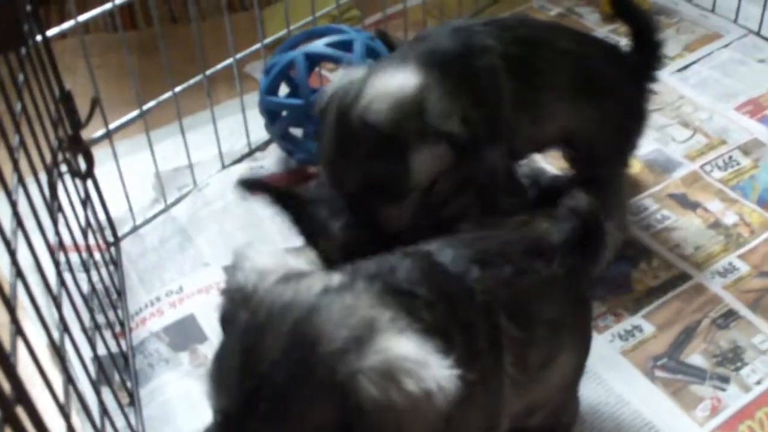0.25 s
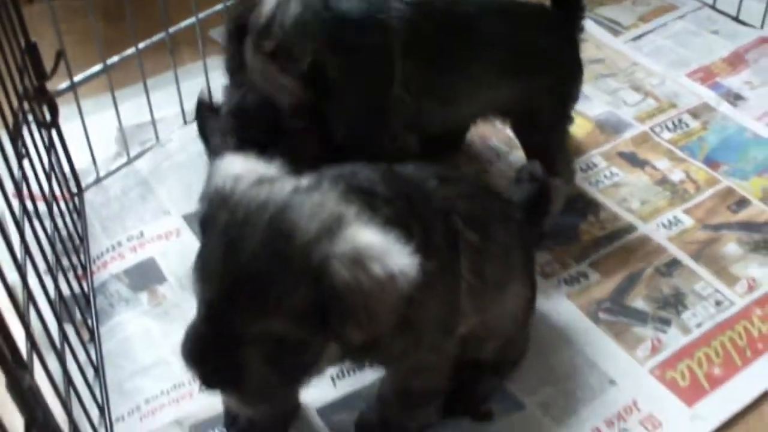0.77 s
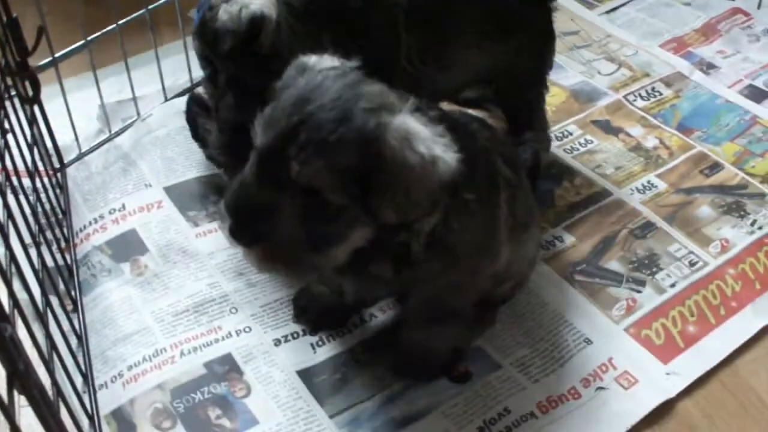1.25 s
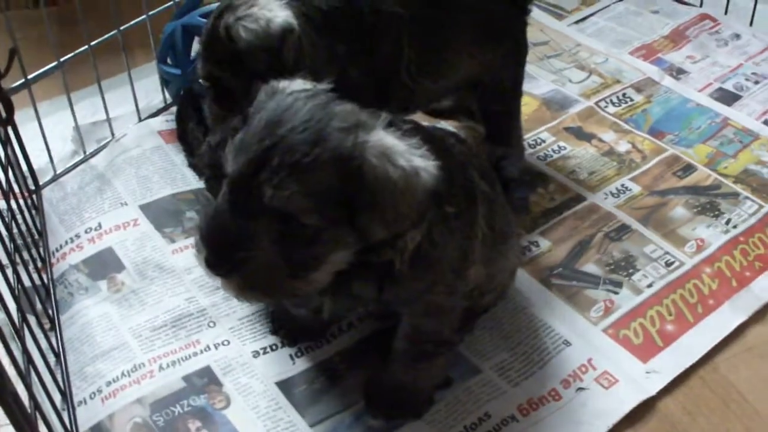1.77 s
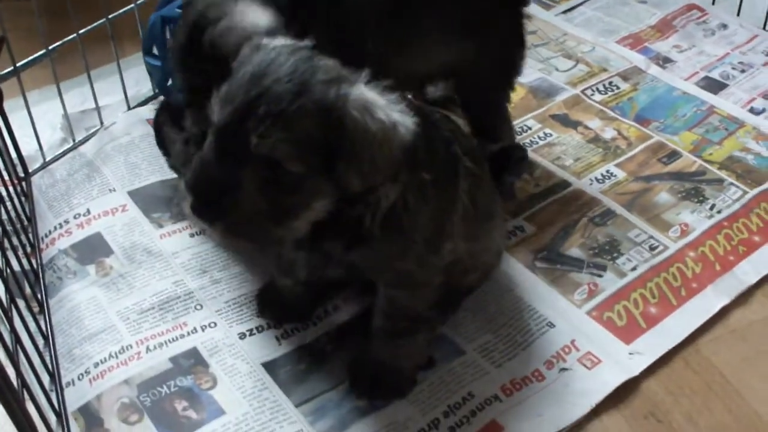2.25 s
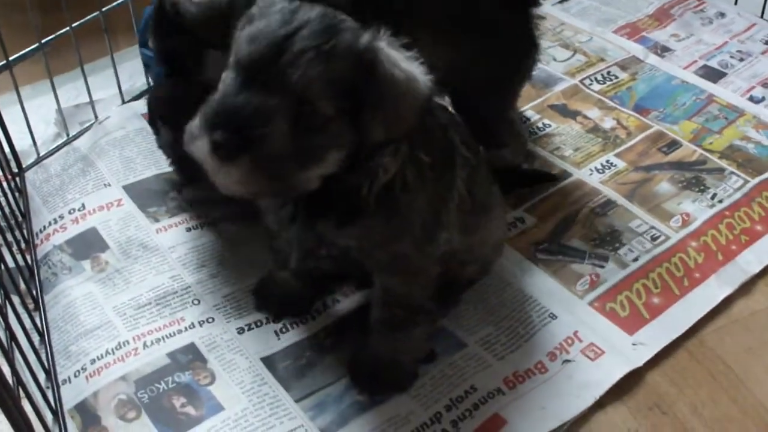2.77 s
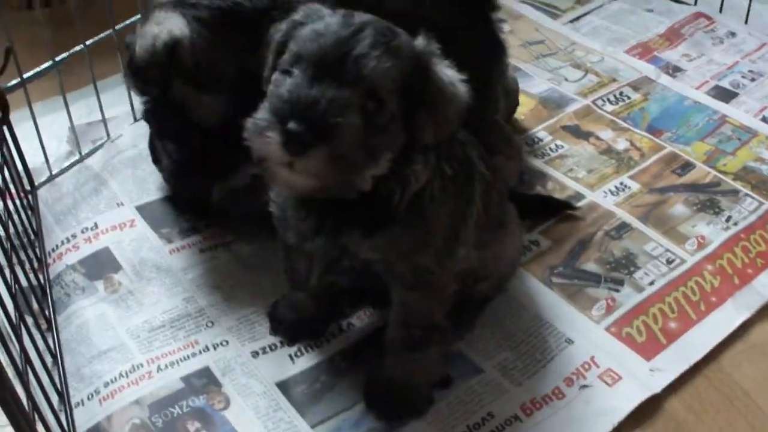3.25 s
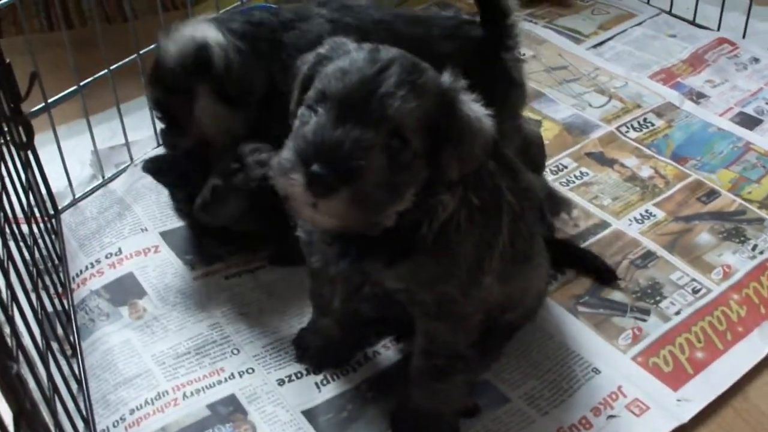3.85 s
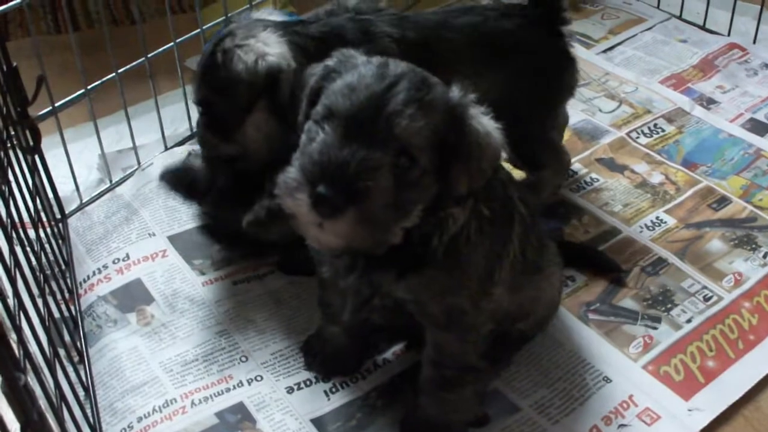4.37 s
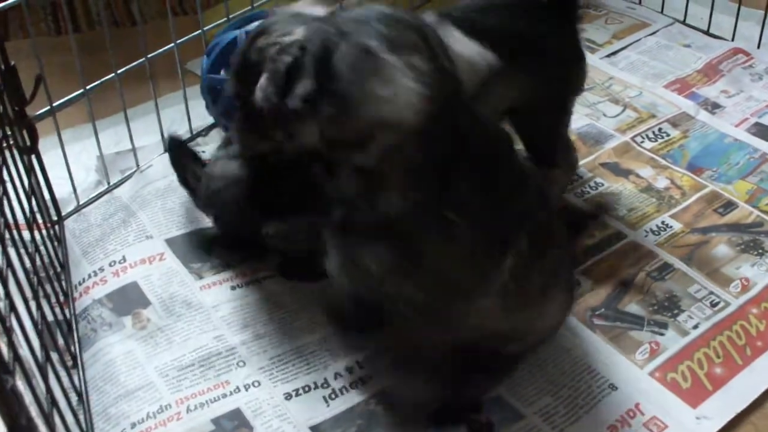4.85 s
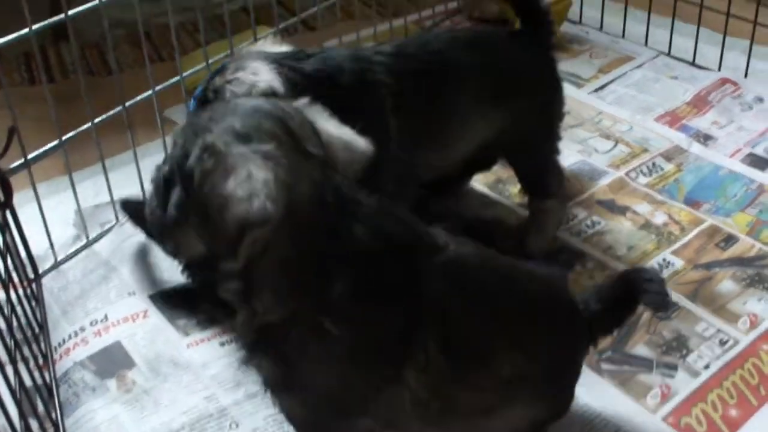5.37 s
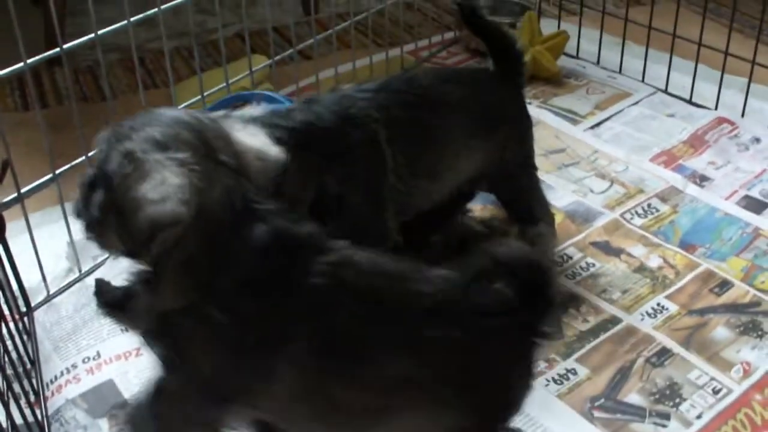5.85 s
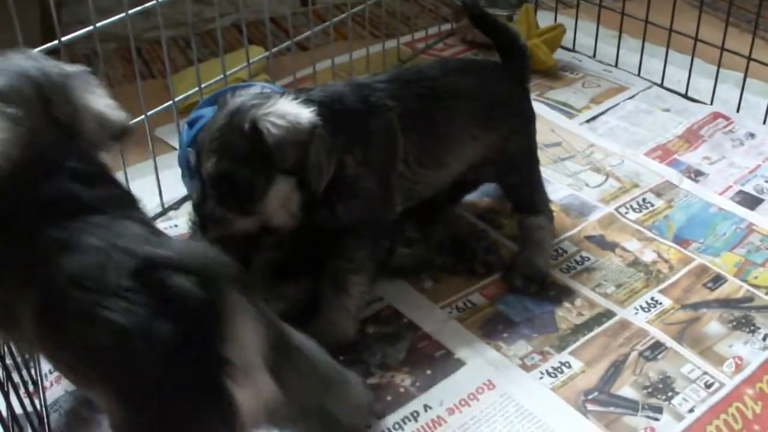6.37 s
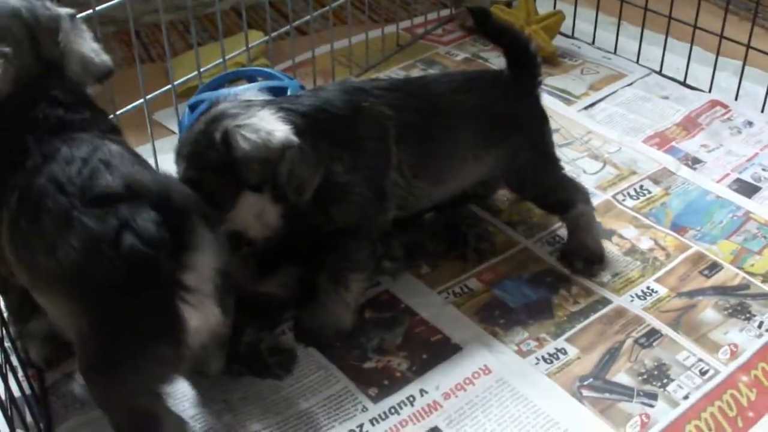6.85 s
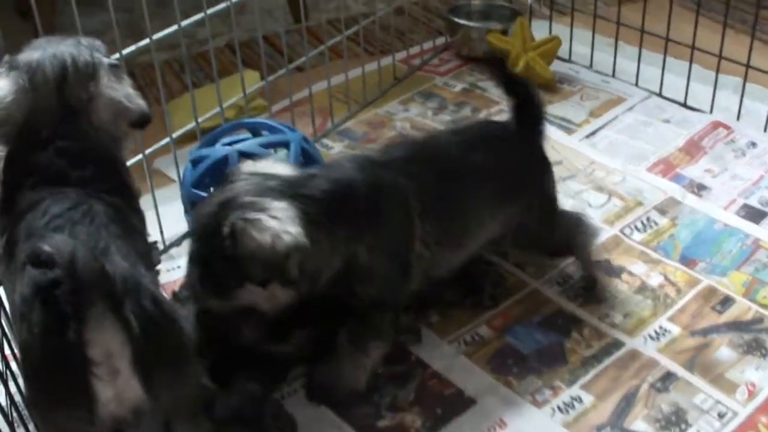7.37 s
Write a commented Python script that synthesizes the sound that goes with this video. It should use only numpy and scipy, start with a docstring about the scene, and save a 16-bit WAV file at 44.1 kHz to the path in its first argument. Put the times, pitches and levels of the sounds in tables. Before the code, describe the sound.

A small, short-echoing room, heard through a modest stereo recorder with constant wide hiss, a very faint high whine and muted top treble. Dull newspaper rustle continues throughout. From 0 to 0.2 s there are small claw ticks, then soft snuffles at 0.3 and 0.75 and paw knocks with a crinkle around 0.85. At 1.24 a high, wavering puppy squeal lasts about 0.3 s, falling slightly and breaking hoarse. Light ticks follow near 2.25; a tiny yip at 2.7. It is quieter until snuffles at 3.66 and 3.93, with taps around 4. A sharp, brighter yelp comes at 4.65, a lower raspy one at 5.03, then quick nose puffs and a crinkle by 5.45. From 5.85 taps cluster; a hoarse squeak sounds at 6.2. Busy knocks, clicks and paper bursts run from 6.6 to 7.15, strongest near 7.06, then a snuffle at 7.34 and rising rustle to the end.

```python
"""Five short puppy yelps, snuffles, claw taps and rustling newspaper in a wire pen indoors, over a wide hiss.
Yelps are harmonics that break into hoarse breath; snuffles are air through a nose resonance; taps ring
floor and claw modes; the paper is clumped grains over sliding noise; the room is dying noise.
The small stereo recorder dips the 3-5 kHz range with three notches and cuts the top."""
import sys
import numpy as np
from scipy import signal
from scipy.fft import rfft, irfft
from scipy.io import wavfile
from scipy.ndimage import uniform_filter1d

SR = 44100
rng = np.random.default_rng(int(sys.argv[2]) if len(sys.argv) > 2 else 0)


def unload_audio(sound):
    """Save the sound as a 16-bit wav file, at the path given as the first command line argument."""
    columns = np.transpose(np.atleast_2d(sound))
    # keep every value between -1 and 1, then stretch to whole-number steps
    steps = np.round(np.clip(columns, -1, 1) * 32767)
    wavfile.write(sys.argv[1], SR, steps.astype(np.int16))


def makeup_ratio(level_db):
    """Linear amplitude ratio for a level in decibels (20 dB per factor of ten)."""
    decades = np.asarray(level_db, float) / 20
    return 10 ** decades


N = 335452

# how busily the bodies shift on the paper: (time [s], dull rustle level [dB])
BUSTLE = [(0, -60.5), (.15, -64), (.9, -64), (1.6, -61.5), (2.0, -64.5), (2.4, -64.5), (2.7, -66),
          (3.7, -63), (4.05, -62), (4.6, -65.5), (5.0, -61.5), (5.65, -66.5), (6.0, -60), (6.35, -61.5),
          (6.78, -59.5), (7.1, -61.5), (7.35, -62.5), (7.6, -57)]


def rms_one(x):
    """Scale to rms 1."""
    return x / np.sqrt(np.mean(x ** 2) + 1e-20)


def in_time(rows):
    """Columns of a (time [s], ...) table as sample-rate curves."""
    time_s, *columns = np.transpose(rows)
    return [np.interp(np.arange(N) / SR, time_s, column) for column in columns]


def at_hz(points, hz):
    """Read a (frequency [Hz], value) table on a log-frequency axis."""
    points = np.array(points)
    return np.interp(np.log(np.maximum(hz, 1)), np.log(points[:, 0]), points[:, 1])


def coloured(x, spectrum):
    """Give noise a spectrum; rms 1."""
    gain = makeup_ratio(at_hz(spectrum, np.fft.rfftfreq(N, 1 / SR)))
    return rms_one(irfft(rfft(x) * gain, N))


def drift(rate_hz):
    """Slow random curve of rms 1: noise through two equal one-pole low-passes."""
    r = np.exp(-2 * np.pi * rate_hz / SR)
    noise = rng.standard_normal(N + SR)
    return rms_one(signal.lfilter([1], [1, -2 * r, r * r], noise)[SR:])


def ring(clicks, hz, t60_s):
    """Two-pole resonator: a unit click starts a decaying sine of initial height 1."""
    r, w = makeup_ratio(-60 / (t60_s * SR)), 2 * np.pi * hz / SR
    return signal.lfilter([0, np.sin(w)], [1, -2 * r * np.cos(w), r * r], clicks + 1e-18)


def yelps():
    """Harmonics on a wavering pitch; hoarseness trades the upper ones for breath pulsing with each cycle."""
    # one track a yelp: (time [s], pitch [Hz], fundamental level [dB], second harmonic level [dB])
    tracks = [
        [(1.24, 872, -64, -60), (1.247, 849, -46, -53), (1.262, 1115, -41, -46), (1.282, 1164, -37, -46.5),
         (1.312, 1170, -58, -39.5), (1.335, 1137, -34, -44.5), (1.372, 1125, -33, -41),
         (1.386, 1107, -34.5, -43.5), (1.415, 1137, -35, -44), (1.43, 1101, -33.5, -47.5),
         (1.44, 1060, -38.5, -49), (1.475, 1029, -42.5, -40.5), (1.495, 1033, -42.5, -47.5),
         (1.51, 1094, -40.5, -48), (1.522, 1013, -46, -55), (1.545, 1052, -56, -66)],
        [(2.7, 1301, -60, -76), (2.709, 1350, -49, -53), (2.713, 1297, -45, -54), (2.722, 1230, -37, -46),
         (2.736, 1145, -35, -40), (2.742, 1152, -36, -40.5), (2.749, 1224, -42.5, -52), (2.756, 1243, -32, -53),
         (2.762, 1200, -47, -56)],
        [(4.65, 1526, -57, -90), (4.657, 1571, -31, -88), (4.663, 1510, -37, -80), (4.667, 1273, -39, -41.5),
         (4.686, 1265, -34, -40), (4.7, 1293, -35, -44), (4.713, 1348, -40.5, -55), (4.726, 1270, -30, -54),
         (4.732, 1188, -41, -46), (4.738, 946, -43.5, -60)],
        [(5.028, 1101, -62, -73), (5.032, 1081, -43, -59), (5.041, 810, -39, -37.5),
         (5.052, 803.5, -36.5, -40.5), (5.063, 818, -36.5, -44.5), (5.07, 863, -43, -43),
         (5.076, 1027, -40, -54), (5.08, 1006, -58, -62)],
        [(6.193, 1134, -73, -70), (6.197, 1117, -37, -66), (6.21, 960, -41.5, -38.5), (6.222, 834, -39, -38.5),
         (6.233, 915, -39, -51), (6.244, 846, -38, -55), (6.25, 852, -54, -62)],
    ]
    # voice of each yelp: (break time [s], hoarseness before [0-1], hoarseness after [0-1], left-right [dB])
    voices = [(1.435, .06, .36, -1), (2.718, .08, .4, 0), (4.71, .08, .3, -.5), (5.03, .85, .85, 1.5),
              (6.215, .65, .9, .5)]
    # upper harmonics and breath: (frequency [Hz], level [dB])
    throat = [(3000, -15), (3600, -6), (4600, 3.5), (5600, 4), (6500, 8), (7500, 0.5), (9000, -2),
              (11000, -7), (14000, -44)]
    # each yelp, relative to its two low harmonics: (treble level [dB], rasp level [dB])
    overtones = [(-15.5, -23), (-15.5, -18), (-13, -19), (-16.5, -19.5), (-19.5, -10.5)]
    # rasp spectrum: (frequency [Hz], density [dB per Hz])
    rasp_colour = [(300, -35), (800, 3), (1400, -7), (2000, 5), (3000, -11.5), (6000, -24.5)]
    break_length_s, onset_s = 0.031, 0.01
    hoarse_treble_db, hoarse_rasp_db = 8, 8.5  # gain per unit of added hoarseness

    pitch_hz, first_db, second_db = in_time(sum(tracks, []))
    t = np.arange(N) / SR
    starts_s = np.array([track[0][0] for track in tracks])
    which = np.maximum(np.searchsorted(starts_s, t, side="right") - 1, 0)
    voiced = sum((t >= track[0][0]) & (t <= track[-1][0]) for track in tracks)
    voiced = uniform_filter1d(voiced.astype(float), size=90)

    break_s, clear, broken, pan_db = np.transpose(voices)[:, which]
    hoarse = clear + (broken - clear) * np.clip((t - break_s) / break_length_s + .5, 0, 1)
    added = hoarse - clear

    effort = np.hypot(makeup_ratio(first_db), makeup_ratio(second_db))
    treble_db, rasp_db = np.transpose(overtones)[:, which]
    opened = np.clip((t - starts_s[which]) / onset_s, 0, 1) ** 2
    treble = effort * makeup_ratio(treble_db + hoarse_treble_db * added) * opened
    rasp = effort * makeup_ratio(rasp_db + hoarse_rasp_db * added) * opened

    jitter = np.sqrt(hoarse) * .006 * drift(150) + (.004 + .05 * added) * drift(30)
    phase = 2 * np.pi * np.cumsum(pitch_hz * (1 + jitter)) / SR
    shimmer = makeup_ratio(1.8 * hoarse * drift(150))
    flutter = makeup_ratio(16 * added * np.clip([drift(110), drift(110)], -3, .8))
    low = makeup_ratio(first_db) * flutter[0] * np.sin(phase)
    low += makeup_ratio(second_db) * flutter[1] * np.sin(2 * phase + 1)

    upper, power = 0, 0
    for order in range(3, 16):
        harmonic_hz = order * pitch_hz
        weight = makeup_ratio(at_hz(throat, harmonic_hz)) * (harmonic_hz < 15000)
        upper = upper + weight * np.sin(order * phase + (order - 3) ** 2)
        power = power + weight ** 2 / 2
    upper /= np.sqrt(power)

    breath = coloured(rng.standard_normal(N), [(1500, -35)] + throat) * (1 + .5 * np.sin(phase))
    voice = np.sqrt(2) * low + treble * (np.sqrt(1 - hoarse) * upper + np.sqrt(hoarse) * breath)
    voice += rasp * coloured(rng.standard_normal(N), rasp_colour)  # turbulence between the low harmonics
    pan = makeup_ratio(np.outer([.5, -.5], np.ones(N)) * pan_db)
    return voiced * shimmer * voice * pan


def snuffles():
    """Puffs of fluttering air, each through one nose resonance."""
    # (start [s], nominal length [s], level [dB], nose resonance [Hz], width [Hz])
    puffs = [(0.305, 0.1, -59.5, 2070, 696), (0.752, 0.06, -61.5, 2240, 700),
             (3.659, 0.043, -55.5, 1900, 880), (3.93, 0.08, -61.5, 1910, 686),
             (5.005, 0.025, -54.5, 2264, 714), (5.297, 0.023, -57.5, 2170, 596),
             (5.423, 0.027, -56, 1260, 1390), (6.919, 0.047, -53.5, 1480, 1170),
             (7.337, 0.029, -48, 2400, 806)]
    out, t = np.zeros(N), np.arange(N) / SR
    air = rng.standard_normal(N) * makeup_ratio(1.7 * drift(60))
    for start_s, length_s, level_db, nose_hz, width_hz in puffs:
        span = slice(int(start_s * SR), int((start_s + 3.4 * length_s) * SR))
        share = (t[span] - start_s) / length_s
        edges_hz = [nose_hz - width_hz / 2, nose_hz + width_hz / 2]
        band = signal.butter(1, edges_hz, "band", fs=SR, output="sos")
        shape = np.clip(share / 0.41, 0, 1) * np.clip((1.6 - share) / 0.61, 0, 1)
        out[span] += makeup_ratio(level_db) * shape * rms_one(signal.sosfilt(band, air[span]))
    return out


def taps():
    """Each tap strikes the floor's and the claw's modes, most strongly those near its own colour."""
    # claws and paws: (time [s], knock level [dB], tick level [dB], knock colour [Hz], tick colour [Hz])
    marked = [(0.031, -49.5, -46.5, 780, 6500), (0.141, -55, -39, 690, 9100),
              (0.189, -63, -46.5, 820, 6070), (0.816, -46, -57, 770, 7880), (0.848, -61, -46, 1770, 5940),
              (0.896, -45, -58, 636, 8050), (1.16, -48.5, -47, 820, 7190), (1.865, -55, -52, 820, 8310),
              (2.249, -59, -38, 1420, 8530), (2.26, -76, -39.5, 442, 8700), (3.955, -56, -44.5, 1850, 6880),
              (3.987, -44.5, -47, 820, 8310), (4.161, -45.5, -61, 1000, 8770),
              (4.762, -42, -45, 1410, 6720), (5.429, -49, -49, 1450, 6790), (5.858, -50, -58, 1190, 6550),
              (5.889, -53, -45, 1920, 7580), (5.936, -43.5, -47, 430, 8570), (5.978, -44, -39, 1284, 6630),
              (6.173, -38.5, -38, 906, 6140), (6.225, -39, -39, 420, 5806), (6.616, -44, -44, 1670, 7190),
              (6.691, -41.5, -43, 1700, 8440), (6.706, -49, -45, 1210, 7800), (6.757, -38, -45, 1490, 7280),
              (6.818, -50, -54, 1160, 6460), (6.908, -61, -44.5, 470, 6680),
              (6.934, -44.5, -55, 1160, 7490), (7.052, -36, -56, 630, 5560),
              (7.059, -38.5, -32.5, 2800, 6200), (7.137, -43.5, -40, 2020, 5700),
              (7.152, -42.5, -48, 2440, 5860)]
    # floor modes: (frequency [Hz], level [dB], t60 [s])
    floor_modes = [(420, 8.5, 0.0088), (810, 3.5, 0.012), (1050, 4, 0.0087), (1460, -2, 0.011),
                   (1900, -1, 0.014), (2290, -3, 0.019), (2800, 6, 0.0076), (3620, 11.5, 0.0034),
                   (4540, 5, 0.011)]
    # claw modes: (frequency [Hz], level [dB], t60 [s])
    claw_modes = [(4650, -4, 0.0051), (5620, -2.5, 0.0052), (6760, -5.5, 0.0053), (8200, -5.5, 0.0063),
                  (9700, -3, .005), (13200, -7, .004)]

    rows = np.vstack([marked, light_taps()])
    time_s, knock_db, tick_db, knock_hz, tick_hz = rows.T
    at = np.minimum(np.round(time_s * SR).astype(int), N - 1)
    modes = [(mode, knock_db, knock_hz) for mode in floor_modes]
    modes += [(mode, tick_db, tick_hz) for mode in claw_modes]
    chance = rng.standard_normal((len(rows), len(modes)))
    out = np.zeros(N)
    for k, ((hz, mode_db, t60_s), blow_db, colour_hz) in enumerate(modes):
        clicks = np.zeros(N)
        away_db = -8.0 * np.abs(np.log2(hz / colour_hz))  # weaker per octave from the tap's colour
        clicks[at] = makeup_ratio(blow_db + mode_db + away_db + 0.69 * chance[:, k]) * (-1) ** k
        out += ring(clicks, hz, t60_s)
    return signal.sosfilt(signal.butter(2, 250, "high", fs=SR, output="sos"), out)


def light_taps():
    """Random soft taps, more often when the pen is busy, as rows like those of the marked taps."""
    taps_per_s = 3.0  # at mean bustle
    knock_db, tick_db, spread_db = -63.5, -52.5, 4.5
    bustle_db, = in_time(BUSTLE)
    at = np.flatnonzero(rng.random(N) < taps_per_s * makeup_ratio(bustle_db - bustle_db.mean()) / SR)
    draw = rng.standard_normal((400, 4))[:len(at)]
    levels_db = [knock_db, tick_db] + spread_db * draw[:, :2]
    colour_hz = [950, 7000] * 2 ** (draw[:, 2:] * [.6, .15])
    return np.column_stack([at / SR, levels_db, colour_hz])


def rustle():
    """Clumped grains of crumpling paper over sliding noise: a steady bustle and single crinkles."""
    # paper crinkling under a paw: (peak time [s], swell [s], bright level [dB], dull level [dB])
    crinkles = [(0.03, 0.018, -75, -69), (0.13, 0.022, -65, -64), (0.38, .08, -81, -68),
                (0.842, 0.052, -58.5, -62), (0.988, 0.019, -62.5, -56), (2.25, .015, -77, -75),
                (2.43, .05, -63, -64), (3.11, .06, -66, -75), (3.44, 0.047, -63, -66),
                (3.96, 0.023, -63, -67), (4.545, .02, -63.5, -76), (5.316, 0.038, -61.5, -74.5),
                (5.434, .014, -65, -47), (5.584, 0.036, -61.5, -58), (5.76, .03, -67, -76),
                (6.0, 0.03, -66, -65), (6.179, .008, -52, -66), (6.45, 0.13, -62.5, -79),
                (6.7, .03, -60, -62), (6.77, .015, -64, -55.5), (6.95, 0.018, -69, -55),
                (7.06, .015, -53.5, -48.5), (7.155, 0.032, -63.5, -63.5), (7.35, 0.034, -74, -62),
                (7.46, .07, -59, -65)]
    # dull rustle spectrum: (frequency [Hz], density [dB per Hz])
    dull_colour = [(100, -18), (400, 4.5), (1000, -0.5), (2500, -7.5), (5000, -21.5), (16000, -31.5)]
    # bright rustle spectrum: (frequency [Hz], density [dB per Hz])
    bright_colour = [(100, -64), (2000, -5), (3500, -4.5), (4700, -8.5), (6500, -1), (9000, -4),
                     (16000, -6.5)]

    bustle_db, = in_time(BUSTLE)
    t = np.arange(N) / SR
    dull = makeup_ratio(bustle_db + 2 * drift(4.7))
    bright = dull * makeup_ratio(-13)
    for peak_s, swell_s, bright_db, dull_db in crinkles:
        width_s = swell_s * np.where(t < peak_s, 0.86, 0.82)  # rise, fall
        swell = np.exp(-((t - peak_s) / width_s) ** 2)
        dull = np.hypot(dull, makeup_ratio(dull_db) * swell)
        bright = np.hypot(bright, makeup_ratio(bright_db) * swell)

    grains_per_s = 2500 * makeup_ratio(5.0 * drift(25))  # the drift clumps them
    born = rng.random(N) < grains_per_s / SR
    height = makeup_ratio(3.5 * np.minimum(rng.exponential(1, N), 4))
    grains = born * height * rng.choice([-1, 1], N)
    rub = rms_one(grains) + 0.95 * rng.standard_normal(N)
    return dull * coloured(rub, dull_colour) + bright * coloured(rub, bright_colour)


def room(x, shared=0.44):
    """Dying noise in octave bands as the room's answer, partly common to both sides."""
    # (frequency [Hz], t60 [s])
    decay = [(300, 0.23), (1300, 0.22), (3500, 0.19), (9000, 0.16)]
    t = np.arange(SR // 2) / SR
    common, *own = rng.standard_normal((3, len(t)))
    white, answer = shared * common + np.array(own) * (1 - shared), 0
    for low_hz in 125 * 2. ** np.arange(7):
        band = signal.butter(2, [low_hz, 2 * low_hz], "band", fs=SR, output="sos")
        dying = makeup_ratio(-60 * t / at_hz(decay, 1.4 * low_hz))
        answer = answer + signal.sosfilt(band, white) * dying
    answer *= np.clip((t - .003) / 0.023, 0, 1)  # echoes start after 3 ms and build up over 23 ms
    answer /= np.sqrt(np.mean(np.sum(answer ** 2, axis=1)))
    return signal.fftconvolve(x[None], answer, axes=1)[:, :N]


def hiss():
    """Wide noise, its channels partly opposed and least so at the top, with two thin electronic tones."""
    # noise spectrum: (frequency [Hz], density [dB per Hz])
    colour = [(30, -25.5), (220, 2), (600, 1.5), (1200, -4), (2000, -9), (4000, -17), (6000, -17),
              (8000, -17), (16000, -20)]
    # left-right correlation: (frequency [Hz], correlation [-1 to 1])
    likeness = [(60, -0.43), (170, -0.6), (480, -0.64), (1360, -0.62), (3850, -0.52), (10900, -0.12)]
    # steady tones: (frequency [Hz], rms level [dB])
    whine = [(7800, -79.5), (7826, -86.5)]
    hz, t = np.fft.rfftfreq(N, 1 / SR), np.arange(N) / SR
    mid, side = rfft(rng.standard_normal((2, N)))
    alike = np.clip(at_hz(likeness, hz), -1, 1)
    pair = np.sqrt(1 + alike) * mid + np.sqrt(1 - alike) * side * [[1], [-1]]
    noise = makeup_ratio(-54.5) * rms_one(irfft(pair * makeup_ratio(at_hz(colour, hz)), N))
    tones = sum(np.sqrt(2) * makeup_ratio(level_db) * np.sin(2 * np.pi * tone_hz * t) for tone_hz, level_db in whine)
    return noise + tones


def scene():
    """The pen in its room, over the hiss."""
    pen = yelps() + snuffles() + taps() + rustle()
    return pen + makeup_ratio(-9) * room(pen.mean(axis=0)) + hiss()


def roll_off(x):
    """The treble ends steeply here."""
    return signal.sosfilt(signal.butter(12, 11490, fs=SR, output="sos"), x)


def record(dry):
    """The recorder's frequency response as a minimum-phase filter."""
    # broad response: (frequency [Hz], level [dB])
    response_db = [(30, -17.5), (100, -5.5), (250, -3), (2100, 2.5), (2600, -4.5), (2900, -15.5),
                   (3400, -11.5), (4500, -10), (5300, -6), (6000, 0), (9000, 0), (11000, -10.5),
                   (11800, -18.5), (12800, -41.5), (13300, -38), (20000, -49)]
    # notches: (centre [Hz], half width at 1/e of the dB depth [Hz], depth [dB])
    notches = [(3013, 72, -31), (4005, 122, -18), (5008, 137, -19.5)]
    size = 8192
    hz = np.fft.rfftfreq(size, 1 / SR)
    level_db = at_hz(response_db, hz)
    for notch_hz, width_hz, depth_db in notches:
        level_db = level_db + depth_db * np.exp(-((hz - notch_hz) / width_hz) ** 2)
    cepstrum = irfft(np.log(makeup_ratio(level_db)), size)
    cepstrum[1:size // 2] *= 2  # folding the cepstrum makes the filter causal
    cepstrum[size // 2 + 1:] = 0
    impulse = irfft(np.exp(rfft(cepstrum)), size)
    mix = signal.fftconvolve(dry, impulse[None], axes=1)[:, :N]
    return roll_off(mix)


dry = scene()
out = record(dry)
unload_audio(out)
```